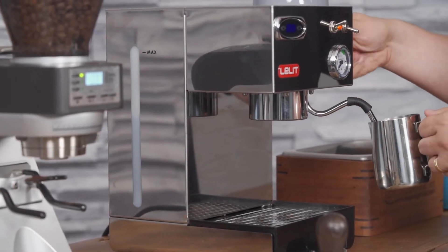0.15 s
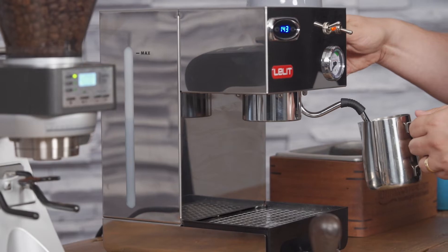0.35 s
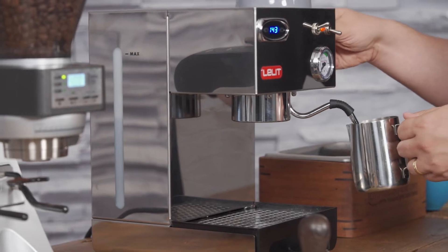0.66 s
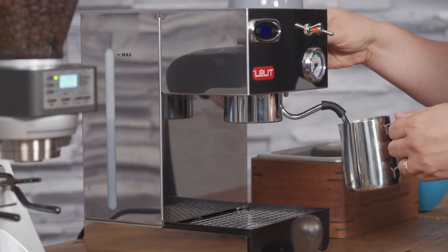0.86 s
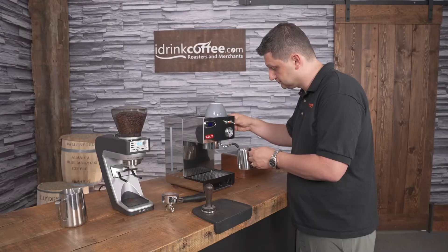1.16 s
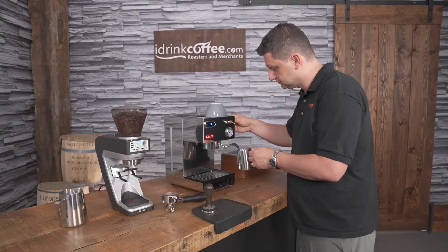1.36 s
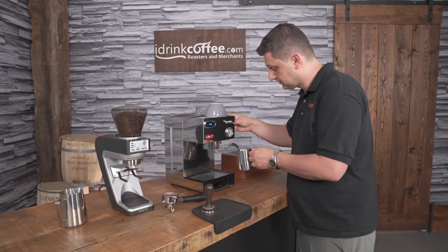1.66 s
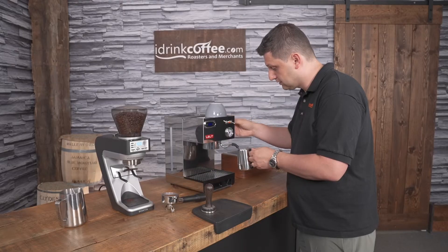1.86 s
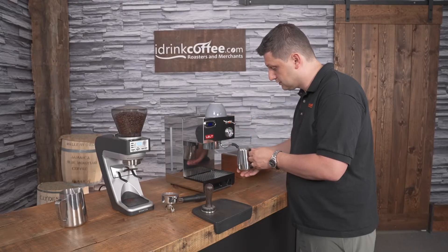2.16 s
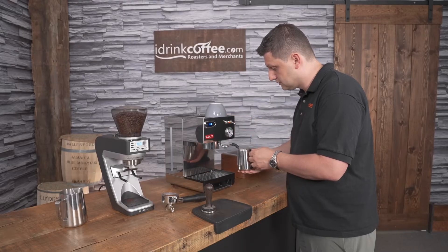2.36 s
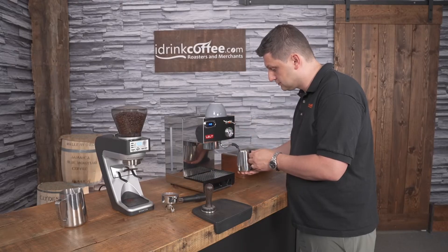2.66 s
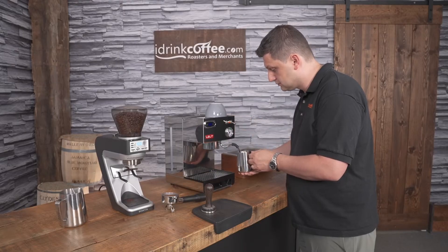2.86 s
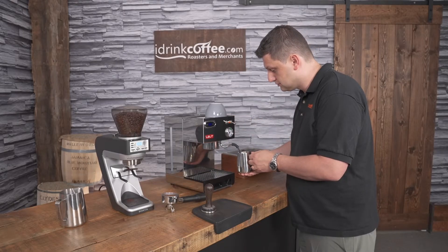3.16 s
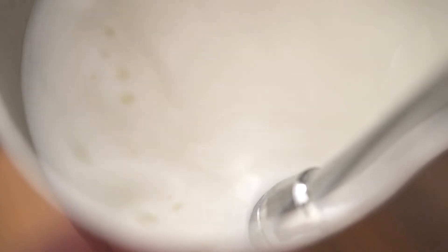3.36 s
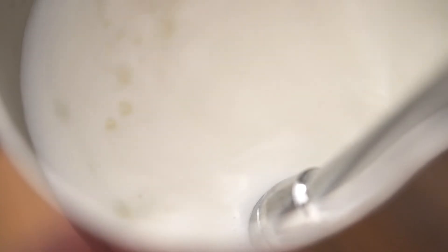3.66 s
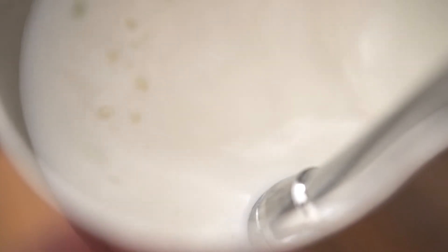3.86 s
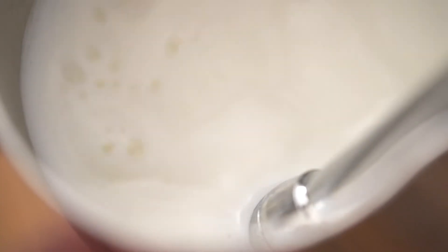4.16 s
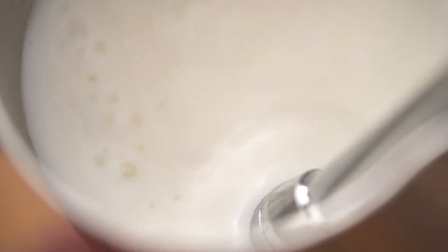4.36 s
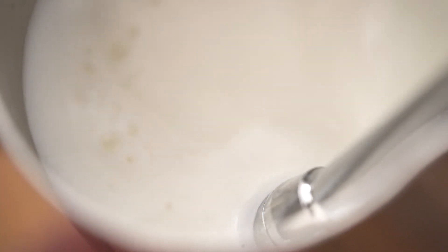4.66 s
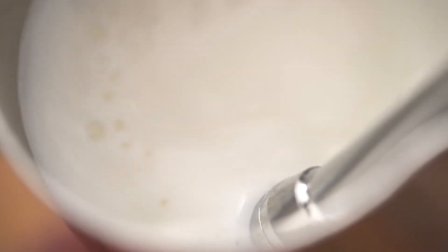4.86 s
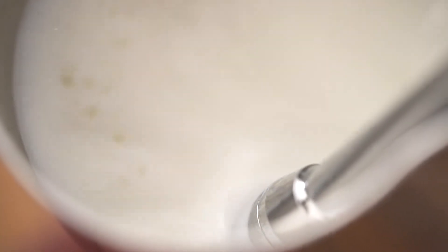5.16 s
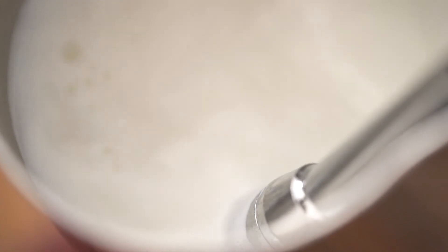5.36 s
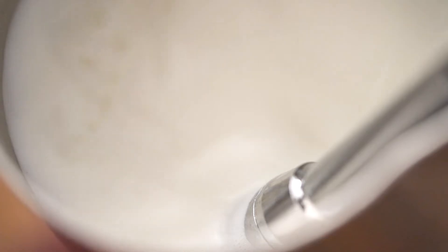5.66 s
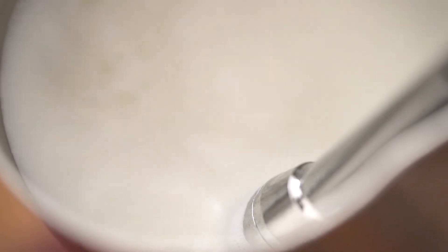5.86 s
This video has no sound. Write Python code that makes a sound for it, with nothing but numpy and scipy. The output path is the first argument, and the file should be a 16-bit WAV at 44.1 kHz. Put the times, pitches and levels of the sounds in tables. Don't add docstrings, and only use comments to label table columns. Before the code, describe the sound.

A close, single-channel sound of milk being steamed in a steel pitcher in a quiet room. From 0 to 1 s there is only faint room air, tiny spits, small bubble plops around 0.35 and 0.55-0.8, and barely audible metal touches with a thin hum. Sputters grow from 1.05, and at about 1.3 s wet gushes break into a roar. From 1.45 to 2.7 s it is loudest: hissing steam, hollow gurgling gulps booming in the pitcher, some overloaded, and from 1.7 a rough, broken squeal near 2 kHz. From 2.7 to 3.5 the gulps cease and the squeal tightens higher, wavering, over hiss. A sharp spitting crackle comes around 3.45. Then the tip sinks: a softer, steadier hiss with a weak high whine and seething. At about 4.95 s it cuts off; a faint seep, low hum, small spits and plops near 5.1, 5.3, 5.8 and 5.9 remain.

```python
import sys
import numpy as np
from scipy import signal
from scipy.fft import rfft, irfft, next_fast_len
from scipy.io import wavfile
from scipy.ndimage import uniform_filter1d, map_coordinates

SR = 44100
rng = np.random.default_rng(int(sys.argv[2]) if len(sys.argv) > 2 else 0)


def bounce(signal):
    frames = np.transpose(np.atleast_2d(signal))
    limited = np.clip(frames, -1, 1)
    pcm = np.round(limited * 32767).astype(np.int16)
    wavfile.write(sys.argv[1], SR, pcm)


def ratio_of_db(decibels):
    return 10 ** (np.asarray(decibels, float) / 20)


N = 264864
TIME_S = np.arange(N) / SR
CUT_S = 4.96
ROAR_S, SONG_S = 1.3066, 1.7

# start in seconds, length in seconds, first pitch in Hz, last pitch in Hz, level in dB.
SQUEAL_LIVES = [(1.7, 0.056, 1587, 1623, -23.5), (1.74, 0.024, 1932, 2120, -17),
                (1.766, 0.022, 2124, 1946, -19.5), (1.788, 0.017, 1930, 1945, -16.5),
                (1.81, 0.064, 1907.0, 2048.0, -30), (1.874, 0.012, 1627, 1626, -38),
                (1.89, 0.011, 1567, 1588, -19.5), (1.904, 0.071, 1915.0, 2003.0, -21),
                (1.97, 0.024, 2166, 2129, -24), (1.995, 0.031, 2088, 2263, -17.5),
                (2.027, 0.065, 2000.0, 2000, -27.5), (2.091, 0.031, 2014, 2067, -28),
                (2.117, 0.02, 2072.0, 2108, -17.5), (2.137, 0.015, 2187, 2127, -15),
                (2.155, 0.078, 2005, 1980, -18.5), (2.207, 0.032, 2050.0, 2031, -19.5),
                (2.243, 0.058, 2067, 1804, -25.5), (2.323, 0.03, 1789, 1859, -22.5),
                (2.349, 0.016, 2018, 2003.0, -11.5), (2.371, 0.014, 2009, 2000, -23.5),
                (2.385, 0.0205, 1937, 2103, -18.5), (2.405, 0.029, 2291.0, 2287.0, -20),
                (2.428, 0.056, 2160.0, 2222, -15), (2.476, 0.04, 2309, 2364, -20),
                (2.512, 0.03, 1966, 1964, -18), (2.546, 0.042, 1983, 1885, -26.5),
                (2.588, 0.044, 1898, 1832.0, -16.5), (2.63, 0.019, 1854, 2152, -17.5),
                (2.648, 0.013, 2076, 2002, -23), (2.66, 0.029, 1832, 2122, -18),
                (2.69, 0.014, 2117, 2403, -29)]
# [s, s, Hz, Hz, dB].
TIGHT_LIVES = [(2.701, 0.031, 2410, 2304, -19), (2.731, 0.028, 2363, 2630, -18),
               (2.757, 0.03, 2522.0, 2446, -16.5), (2.788, 0.026, 2683, 2740, -21),
               (2.813, 0.087, 2707, 2894.0, -27), (2.89, 0.056, 2750, 2605.0, -22.5),
               (2.946, 0.015, 2610, 2400, -25), (2.957, 0.051, 2409, 2333.0, -18.5),
               (3.008, 0.041, 2155, 2170, -23), (3.053, 0.019, 2386, 2620, -22.5),
               (3.075, 0.042, 2290, 2537, -26), (3.115, 0.014, 2517, 2780, -14),
               (3.134, 0.017, 2867, 2915.0, -24.5), (3.145, 0.072, 2677, 2735, -21.5),
               (3.214, 0.053, 2746, 3020, -27.5), (3.266, 0.02, 2780, 2861.0, -21.5),
               (3.305, 0.077, 2733, 2536, -27), (3.373, 0.036, 2584, 2327.0, -20.5),
               (3.409, 0.016, 2348.0, 2514, -27), (3.425, 0.017, 2605, 2786.0, -22.5),
               (3.509, 0.034, 2284.0, 2290, -24), (3.536, 0.018, 2432, 2398.0, -27.5),
               (3.554, 0.026, 2127, 2118, -27.5), (3.579, 0.02, 2047, 2450, -39.5)]
# [s, s, Hz, Hz, dB].
SUNK_LIVES = [(3.602, 0.038, 2467.0, 2464.0, -27), (3.638, 0.019, 2445.0, 2480.0, -21.5),
              (3.658, 0.043, 2645.0, 2891.0, -26), (3.698, 0.017, 2891.0, 2754.0, -20.5),
              (3.722, 0.042, 2760.0, 2683.0, -34.5), (3.761, 0.012, 2697.0, 2652, -21),
              (3.776, .019, 2600, 2510, -26.5), (3.795, 0.073, 2670.0, 2786.0, -34.5),
              (3.867, 0.015, 2791.0, 2640.0, -29), (3.881, 0.028, 2436.0, 2434.0, -24.5),
              (3.911, 0.025, 2475.0, 2551.0, -29.5), (3.935, 0.052, 2955.0, 2932.0, -29.5),
              (3.985, 0.05, 2771.0, 2962.0, -33.5), (4.141, 0.044, 2686.0, 2747.0, -42.5),
              (4.182, 0.025, 2755.0, 2759.0, -30), (4.204, 0.07, 2825.0, 2890.0, -35),
              (4.272, 0.0386, 2507.0, 2418.0, -34.5), (4.312, 0.051, 2579.0, 2849.0, -37),
              (4.4, 0.058, 2811.0, 2797.0, -39), (4.5, 0.047, 2913.0, 2794.0, -41),
              (4.536, 0.11, 2900.0, 2721.0, -34.5), (4.653, 0.046, 2898.0, 2734.0, -29.5),
              (4.699, 0.064, 2860.0, 2826.0, -31.5), (4.769, 0.089, 2783.0, 2700.0, -29),
              (4.857, 0.024, 2689.0, 2869.0, -34.5)]
# frequency in Hz, level in dB, 60 dB decay time in seconds.
STEEL_MODES = [(3770, -5, 0.18), (4540, -3, 0.17), (5340, 5, 0.15), (5870, 0.5, 0.21)]


def unit(x):
    return x / np.sqrt(np.mean(np.abs(x) ** 2) + 1e-20)


def along(points, hz):
    f, v = np.transpose(points)
    return np.interp(np.log(hz + 1), np.log(f + 1), v)


def curves(table):
    s, *columns = np.transpose(table)
    return [np.interp(TIME_S, s, column) for column in columns]


def wobble(knots_per_s):
    return map_coordinates(rng.standard_normal(N // 20), [np.arange(N) * knots_per_s / SR])


def filtered(x, response):
    m = next_fast_len(N + 8192)
    return irfft(rfft(x, m) * response(np.fft.rfftfreq(m, 1 / SR)), m)[:N]


def noise(response, patchy_db):
    z = signal.stft(rng.standard_normal(N + 512), nperseg=256)[2]
    field = uniform_filter1d(rng.standard_normal(z.shape), size=5, axis=0)
    field = uniform_filter1d(field, size=6, axis=1)
    depth_db = np.interp(np.linspace(0, N, z.shape[1]), np.arange(N), patchy_db * np.ones(N))
    patchy = signal.istft(z * ratio_of_db(depth_db * unit(field)), nperseg=256)[1][:N]
    return unit(filtered(patchy, response))


def coloured(points, patchy_db):
    return noise(lambda f: ratio_of_db(along(points, f)), patchy_db)


def resonant(modes):
    def response(f):
        return sum(ratio_of_db(db) * (1j * f * w / (c * c - f * f + 1j * f * w)) ** 2 for c, w, db in modes)
    return response


def shifted(x, hz):
    analytic = signal.hilbert(x, next_fast_len(N))[:N]
    return (analytic * np.exp(2j * np.pi * np.cumsum(hz) / SR)).real


def bursts(rows, rise_s, fall_s):
    gain, t = np.zeros(N + SR), np.arange(SR // 8) / SR
    for s, db, length_s in rows:
        closing = 1 + np.exp(np.clip((t - length_s) / fall_s, -50, 50))
        gain[round(s * SR):][:len(t)] += ratio_of_db(db) * (1 - np.exp(-t / rise_s)) / closing
    return gain[:N]


def whistles(at, hz, db, life_s, glide_oct):
    step = np.arange(1500)
    age = step / SR / life_s
    phase = 2 * np.pi * np.cumsum(hz * 2 ** (glide_oct * np.minimum(age, 2)), axis=1) / SR
    notes = ratio_of_db(db) * age * np.exp(1 - age ** 2) * np.sin(phase)
    return np.bincount((at + step).ravel(), notes.ravel(), N + 1500)[:N]


def valve():
    # time in seconds, flow in dB, air in dB, depth as dB of sizzle lost.
    open_valve = [(0.0, -101, -17, -4), (0.59, -78, 16, -5.5), (0.72, -70.5, 29, 2),
                  (0.87, -71.5, 2, -15.5), (1.05, -64, -28, -4.5), (1.34, -49, 19.5, 7.5),
                  (1.455, -34.5, 2.5, 9), (1.47, -41, 20.5, 22.5), (1.69, -30, 1, 5), (2.11, -29.5, -6, -1),
                  (2.6, -26, -12, 6), (2.77, -29, -16.5, 1.5), (3.3, -33, -18.5, 2),
                  (3.471, -37, -2.5, -5.5), (3.608, -33, -20.5, 10), (3.72, -35.5, -30.5, 12),
                  (4.799, -36.5, -36.5, 7), (4.92, -39.5, -13, -6)]
    # start in seconds, extra air in dB, length in seconds.
    draughts = [
        (2.003, 1, 0.061),
        (2.1, 1.5, 0.13),
        (2.42, 0.5, 0.064),
        (2.796, -11, 0.16),
        (2.94, 9, .17),
        (3.148, 5.5, 0.028),
        (3.193, -23.5, 0.103),
        (3.882, 13, 0.13),
        (4.578, 12, .3),
    ]
    # flow, air and depth in dB.
    seep = (-57, -3.2, 5.7)
    flow_db, air_db, depth_db = curves(open_valve)
    for s, db, length_s in draughts:
        air_db = air_db + db * np.clip(np.minimum(TIME_S - s, s + length_s - TIME_S) / 0.0064, 0, 1)
    return [np.where(TIME_S > CUT_S, rest, flowing)
            for flowing, rest in zip((flow_db, air_db, depth_db), seep)]


def wall(f):
    # frequency in Hz, width in Hz, lift in dB.
    wall_modes = [(2930, 110, -2.5), (4110, 1100, 6.5), (5330, 1260, 6.5), (5740, 180, 3.5),
                  (7250, 1480, 7.5), (9570, 580, 3), (14100, 1400, 7.5)]
    return sum(db / (1 + (2 * (f - c) / w) ** 2) for c, w, db in wall_modes)


def spit_gain(lean, db):
    # start in seconds, peak in dB, tilt in dB.
    spits = [(0.155, -46.5, -1), (0.556, -45.5, -6), (.676, -63, -8), (0.799, -49.5, -15), (0.878, -57, 5),
             (0.922, -48, 13), (0.943, -39.5, 0), (1.031, -44, -6), (1.955, -18, 9), (2.0235, -11, -2),
             (2.6663, -13, 7.5), (3.2902, -23, 13.5), (3.5655, -14, -3), (5.0875, -35.5, 15.5),
             (5.138, -38.5, 1.5), (5.281, -36.5, 16.5), (5.847, -50.5, 22), (5.9114, -33.5, 22)]
    # start in seconds, peak in dB, tilt in dB.
    snaps = [(.231, -46, -13), (.277, -49, -12), (1.2106, -33.5, -11), (1.225, -23, -9), (1.236, -27, -9),
             (3.428, -9, 13), (3.4547, -18, 21.5), (3.461, -17.5, 20), (3.4649, -14, 25), (4.184, -22, -3),
             (3.762, -20, -2)]
    # start in seconds, peak in dB, tilt in dB, length in seconds.
    gushes = [(1.056, -32.5, -14.5, 0.013), (1.066, -35.5, -11, 0.024), (1.087, -27.5, -5.5, 0.034),
              (1.2586, -31, -17.5, 0.04), (1.3066, -19, -5.5, 0.033), (1.466, -9, -8.5, 0.038),
              (1.5, -9.5, -6.5, 0.039), (1.535, -9.5, -7, 0.03), (1.68, -16, -3.5, 0.054),
              (1.764, -29.5, 13.5, 0.045), (1.806, -20, -4, 0.025), (2.341, -21, -7.5, 0.015),
              (2.498, -15.5, -7, 0.046), (2.943, -22, 6, 0.099), (3.313, -21, -1.5, 0.066),
              (3.435, -27, 16, 0.045), (3.511, -20.5, 2.5, 0.031), (3.575, -25, 6, 0.019),
              (3.8746, -26.5, -15.5, 0.023), (3.636, -35, 0, 0.021), (3.742, -39.5, 11, 0.071),
              (3.808, -42.5, 14, .1), (4.739, -43.5, 13, 0.048), (4.923, -39.5, 12, 0.022),
              (5.92, -42, 12, 0.021)]
    rows = [(*row, 0.0087) for row in spits] + [(*row, 0.0019) for row in snaps] + list(gushes)
    leaning = [(s, peak + lean * tilt + db, length_s) for s, peak, tilt, length_s in rows]
    return bursts(leaning, rise_s=.002, fall_s=.0013)


def jet():
    # frequency in Hz, level in dB per Hz.
    hiss_colour = [(1200, -43), (1900, -8), (2900, 4), (3550, -4), (5330, -1), (6370, -11.5), (7500, -9.5),
                   (9750, -36), (16500, -120)]
    # frequency in Hz, level in dB per Hz.
    sizzle_colour = [(3530, -29.5), (6000, -12), (8570, -8.5), (9740, -3), (14700, -23.5), (16000, -21.5)]
    # frequency in Hz, level in dB per Hz.
    splash_colour = [(900, -18), (1300, 6.5), (2000, 8.5), (3000, 8), (3800, 2.5), (6000, -50)]
    # frequency in Hz, width in Hz, level in dB.
    leak_modes = [(4500, 300, -1), (5830, 300, 2), (3340, 1400, -5), (7440, 440, -2), (9500, 254, -6)]
    flow_db, air_db, depth_db = valve()
    unrest = np.clip(1.5 + air_db / 48, .3, 1)
    flutter_db, jitter_db = 1.9 * unrest * wobble(30), 2.2 * unrest * wobble(90)

    hiss_gain = ratio_of_db(flow_db + flutter_db + jitter_db) + spit_gain(lean=0, db=-9.5)
    hiss = hiss_gain * noise(lambda f: ratio_of_db(along(hiss_colour, f) + wall(f)), 4.35 * unrest)
    sizzle_gain = ratio_of_db(flow_db - depth_db + 2 * flutter_db + jitter_db) + spit_gain(lean=1, db=-12.0)
    sizzle = sizzle_gain * noise(lambda f: ratio_of_db(along(sizzle_colour, f) + wall(f)), 4.3 * unrest)
    splash = spit_gain(lean=-1.07, db=-19.0) * coloured(splash_colour, patchy_db=4.0)
    slurp_db = flow_db - 2 + 0.75 * np.minimum(air_db, 0) + 2 * flutter_db
    slurp = ratio_of_db(slurp_db) * noise(resonant([(2074, 490, 0)]), patchy_db=2.5)
    leak = ratio_of_db(-59 + flutter_db) * (TIME_S > CUT_S) * noise(resonant(leak_modes), patchy_db=0.0)
    return hiss + sizzle + splash + slurp + leak


def pitcher_air():
    # frequency in Hz, width in Hz, level in dB.
    low_stages = [
        [(950, 55, 7), (706, 360, -4), (1150, 140, -13)],
        [(850, 38, 4), (950, 18, -15.5)],
        [(769, 53, -1), (940, 31, -22.5)],
        [(750, 150, -7.5), (960, 78.6, -4.5)],
    ]
    # frequency in Hz, width in Hz, level in dB.
    high_modes = [(1290, 159, 6), (1189.6, 70, -2)]
    # time in seconds, upper resonance in Hz.
    headroom = [(2.6, 1299), (2.9, 1270), (3.15, 1309), (3.35, 1202), (3.55, 1230), (3.7, 1419),
                (3.83, 1418), (3.9, 1230), (4.25, 1389), (4.6, 1340), (4.95, 1318)]
    flow_db, air_db, _ = valve()
    foam = np.interp(TIME_S, [1.24, 1.29, 1.75, 2.3, 2.6, 3.9], [0, 1, 1, 2, 1.5, 3.5])
    hollow = 0
    for stage, modes in enumerate(low_stages):
        share = np.sqrt(np.maximum(1 - abs(foam - stage), 0))
        hollow = hollow + share * noise(resonant(modes), patchy_db=-3.5)
    low = ratio_of_db(flow_db + air_db + 1.4 * wobble(40)) * hollow

    room_hz, = curves(headroom)
    high_db = flow_db + 5.5 + 0.47 * np.minimum(air_db, 0)
    high_db = high_db - 9 * (foam < .5)
    ring = shifted(noise(resonant(high_modes), patchy_db=2.0), room_hz - high_modes[0][0])
    return low + ratio_of_db(high_db + 2.2 * wobble(40)) * ring


def fizz():
    # start in seconds, level in dB, length in seconds.
    breaks = [
        (3.44, -30, 0.043),
        (4.742, -34, 0.017),
        (4.876, -33.5, 0.076),
        (5.089, -38, 0.01),
        (5.284, -46, 0.0038),
        (5.847, -35, 0.0057),
        (5.912, -29, 0.014),
    ]
    gain = bursts(breaks, rise_s=0.0016, fall_s=0.00134)
    return gain * noise(resonant([(14300, 1400, 0)]), patchy_db=-6.5)


def glides(rows):
    s, length_s, first_hz, last_hz, db = np.transpose(rows)
    now = np.maximum(np.searchsorted(s, TIME_S) - 1, 0)
    age = np.clip((TIME_S - s[now]) / length_s[now], 0, 1)
    hz = first_hz[now] + (last_hz - first_hz)[now] * age
    alive = np.abs(np.sin(np.pi * age)) ** 0.099 * (age > 0) * (age < 1)
    return [uniform_filter1d(v, size=130) for v in (hz, db[now], alive)]


def pocket():
    # multiple of the pitch, level in dB, smear in Hz.
    overtones = [(1, 2, 120), (2, -14.5, 380), (3, -18.5, 920)]
    # start in seconds, level in dB, length in seconds.
    flares = [
        (2.69, -25, 0.031),
        (2.89, -21.5, 0.015),
        (2.945, -34, 0.066),
        (3.04, -23, 0.077),
        (3.2, -46, 0.089),
        (3.31, -20.5, 0.05),
        (3.375, -21, 0.059),
        (3.51, -41, .03),
    ]
    hz, db, alive = glides(np.vstack([SQUEAL_LIVES, TIGHT_LIVES, SUNK_LIVES]))
    phase = 2 * np.pi * np.cumsum(hz * (1 + .014 * wobble(120))) / SR
    tone = 0
    for multiple, level_db, smear_hz in overtones:
        clear = 2.2 / multiple * np.clip((db + 44.5) / 22, 0, 1)
        core = unit(clear + wobble(smear_hz) + 1j * wobble(smear_hz))
        strands = wobble(6.0 * smear_hz / multiple) + 1j * wobble(6.6 * smear_hz / multiple)
        gain = ratio_of_db(db + level_db) * alive
        if multiple == 2:
            gain = gain + ratio_of_db(1.5) * bursts(flares, rise_s=0.0044, fall_s=0.003)
        tone = tone + gain * ((core + 0.37 * strands) * np.exp(1j * multiple * phase)).real
    return ratio_of_db(1.1 * wobble(45)) * tone


def splits():
    hz, db, alive = glides(np.vstack([SQUEAL_LIVES, TIGHT_LIVES, SUNK_LIVES]))
    when, pitch, glide, size, life, octave = rng.random((900, 6)).T[..., None]
    at = ((SONG_S + when * (CUT_S - SONG_S)) * SR).astype(int)
    upper = octave > .6
    level_db = db[at] - 5.5 - 6.0 * upper - 7.3 * size - 60 * (alive[at] < .5)
    note_hz = hz[at] * 2 ** (upper + 0.1314 * (2 * pitch - 1))
    return whistles(at, note_hz, level_db, life_s=0.0079 * (.5 + life), glide_oct=.15 * (glide - .3))


def gulps():
    # start in seconds, peak in dB, pitch in Hz, length in seconds.
    bubbles = [(.352, -34, 850, 0.024), (.372, -43, 1035, 0.016), (.575, -31, 1150, 0.0058),
               (0.601, -27.5, 960, 0.0061), (.64, -25, 706, 0.0099), (0.658, -26, 827, 0.0064),
               (0.679, -19, 990, 0.0051), (.688, -33, 1150, 0.0073), (0.737, -18.5, 886, 0.019),
               (.757, -35, 1150, 0.016), (.78, -24.5, 700, 0.0091), (1.704, -1, 1364, 0.0095),
               (1.722, -7, 1510, 0.013), (0.795, -28, 850, 0.018)]
    # start in seconds, peak in dB, pitch in Hz, length in seconds.
    rising = [(0.4713, -44, 1290, 0.0064), (1.118, -34, 887, 0.021), (1.306, -9.5, 1243, 0.022),
              (1.42, -10.5, 796, 0.013), (1.4713, -4, 1220, 0.015), (1.484, -4.5, 824, 0.021),
              (1.49, -4, 1274, 0.048), (1.521, -3.5, 1349, 0.014), (1.62, -6.5, 850, 0.021),
              (1.673, -2.5, 860, 0.011), (1.697, 4.5, 1161, 0.0098), (1.718, -13.5, 3283, 0.02),
              (1.908, -18.5, 3770, 0.02), (2.428, -17.5, 6800, 0.05), (1.8918, 3, 1383, 0.0054),
              (1.988, -10, 1320, 0.013), (2.032, -7, 808, 0.032), (2.0645, 7.5, 1314, 0.012),
              (2.0824, 0.5, 1338, 0.016), (2.298, -4.5, 787, 0.031), (2.548, -5, 1350, 0.018),
              (2.562, -3, 790, .024), (2.564, -2, 1335, 0.022), (2.659, -8.5, 1318, 0.012)]
    # start in seconds, peak in dB, pitch in Hz, length in seconds.
    sinking = [(0.319, -36, 950, 0.026), (0.559, -33.5, 840, 0.056), (1.062, -21, 875, 0.031),
               (1.274, -4.5, 802, 0.018), (1.294, 2, 708, 0.023), (1.333, -10, 744, 0.03),
               (1.5509, 1.5, 1280, 0.0055), (1.555, 0, 855, 0.03), (1.647, -5.5, 843, 0.021),
               (1.697, 5.5, 833, 0.014), (1.8088, -4, 1410, 0.01), (1.816, 1, 746, 0.031),
               (1.862, -4.5, 752, 0.03), (1.9, -7.5, 697, 0.033), (2.0268, 5, 1290, 0.0079),
               (2.06, -0.5, 818, 0.017), (2.1014, -1.5, 1310, 0.016), (2.2412, 3, 1246, 0.0066),
               (2.247, 5, 1294, 0.0071), (2.251, -4, 776, 0.046), (2.2987, 0.5, 1264, 0.024),
               (2.518, -2.5, 1350, 0.012), (2.523, 2, 1113, 0.012), (2.531, 5, 764, 0.02),
               (2.6004, -8, 1323, 0.019), (3.479, -20.5, 3590, 0.011), (3.615, -24.5, 3410, 0.022),
               (3.7636, -28, 1404, 0.015), (4.9276, -27.5, 1370, .011), (5.089, -24.5, 1290, 0.008),
               (5.345, -30.5, 740, 0.0099), (5.764, -35, 2040, 0.0053), (5.7705, -19, 1290, 0.0039),
               (5.772, -31, 720, 0.0063), (5.917, -29, 1157, 0.008)]
    # frequency in Hz, level in dB per Hz.
    gurgle_colour = [(480, -70), (620, 5.5), (900, 12.5), (1400, -12), (2200, -27), (4000, -50)]
    out, t = np.zeros(N + SR), np.arange(SR // 8) / SR
    sources = [wobble(300), wobble(150), coloured(gurgle_colour, patchy_db=0.5)]
    ragged, uneven, gurgle = np.pad(sources, ((0, 0), (0, SR)))
    for rows, glide_oct in [(bubbles, 0.27), (rising, 0.11), (sinking, -0.079)]:
        for s, db, hz, length_s in rows:
            at = slice(round(s * SR), round(s * SR) + len(t))
            glide_hz = hz * 2 ** (glide_oct * (np.minimum(t / length_s, 1.8) - .6))
            unrest = 0.43 * max(hz / 1500, 1)
            phase = 2 * np.pi * np.cumsum(glide_hz) / SR + unrest * ragged[at]
            hold = max(2.16 + 0.0528 * db, 1.5)
            swell = ratio_of_db(-9 * (t / length_s) ** hold) * (1 - np.exp(-t / 0.00089))
            rough = ratio_of_db(-19.0 - .28 * db)
            out[at] += ratio_of_db(db - 1.5 + uneven[at]) * swell * (np.sin(phase) + rough * gurgle[at])
    return filtered(out[:N], lambda f: f ** 6 / (f ** 6 + 800.0 ** 6))


def chirps():
    # start in seconds, level in dB, length in seconds.
    seethes = [
        (3.77, -31.5, 0.037),
        (4.19, -34, .06),
        (4.3, -31.5, 0.093),
        (4.4, -35.5, .09),
        (4.65, -33, 0.056),
        (4.77, -36.5, 0.13),
        (4.9, -34, 0.056),
    ]
    flow_db, air_db, _ = valve()
    seethe = bursts(seethes, rise_s=0.0037, fall_s=0.0072) * noise(resonant([(5260, 860, 0)]), patchy_db=1.0)
    when, pitch, glide, size, life = rng.random((900, 5)).T[..., None]
    at = ((ROAR_S + when * (CUT_S - ROAR_S)) * SR).astype(int)
    db = flow_db[at] - 6.5 + .3 * np.minimum(air_db[at], 0) - 3.2 * np.log(size + 0.03)
    hz = 4013 * 2 ** (.6 * (2 * pitch - 1))
    return whistles(at, hz, db, life_s=.007 * (.5 + life), glide_oct=.28 * (glide - .25)) + seethe


def milk():
    # frequency in Hz, level in dB per Hz.
    churn_colour = [(15, -36), (25, -8.5), (43, -21), (118, -4.5), (253, 0), (515, 0), (626, -17), (700, 6),
                    (910, -37), (1540, -120)]
    # start in seconds, peak in dB.
    thumps = [(0.161, -45), (0.314, -37.5), (1.056, -39), (1.695, -22), (2.065, -34), (2.242, -34),
              (2.298, -46), (2.524, -14), (3.452, -24), (3.461, -17.5), (5.911, -33.5)]
    churn = coloured(churn_colour, patchy_db=1.0)
    heave = bursts([(s, db - 4.5, .006) for s, db in thumps], rise_s=0.0024, fall_s=0.0067) * churn
    heave = filtered(heave, lambda f: f * f / (f * f + 31.0 ** 2))
    flow_db, air_db, _ = valve()
    return ratio_of_db(-47 + 0.25 * flow_db + 0.32 * air_db) * churn + heave


def knocks():
    # start in seconds, level in dB.
    touches = [
        (.559, -59),
        (.806, -59),
    ]
    out, t = np.zeros(N), np.arange(SR // 4) / SR
    for s, db in touches:
        for hz, level_db, t60_s in STEEL_MODES:
            decay = ratio_of_db(db + level_db + rng.normal(0, 3) - 60 * t / t60_s)
            out[round(s * SR):][:len(t)] += decay * np.sin(2 * np.pi * hz * t)
    return out


def singing():
    hum = noise(resonant([(hz, 60, 0) for hz, *_ in STEEL_MODES]), patchy_db=-1.0)
    return ratio_of_db(-75 + 3.0 * wobble(10.3)) * (TIME_S > .558) * (TIME_S < 1.0) * hum


def kitchen():
    # frequency in Hz, level in dB per Hz.
    room_colour = [(15, -52), (25, -10), (102, -1.5), (242, -7), (394, -14.5), (489, -8), (1100, -24.5),
                   (9570, -33), (14000, -28.5), (16000, -61)]
    # start in seconds, end in seconds, pitch in Hz, level in
    # dB.
    tones = [
        (5.15, 5.92, 105, -60),
        (5.2, 5.7, 391, -65),
        (.85, 1.6, 325, -65),
        (1.25, 1.45, 320, -57),
        (.3, .8, 2010, -76),
        (4.922, 4.946, 400, -53),
    ]
    air = ratio_of_db(-61) * coloured(room_colour, patchy_db=-1.0)
    drift = .8 * wobble(14)
    hum = 0
    for start_s, end_s, hz, db in tones:
        edge_s = 0.027 * (end_s - start_s)
        fade = np.clip(np.minimum(TIME_S - start_s, end_s - TIME_S) / edge_s, 0, 1)
        hum = hum + ratio_of_db(db) * fade * np.sin(2 * np.pi * hz * TIME_S + drift)
    return air + ratio_of_db(3 + 1.8 * wobble(14)) * hum


def scene():
    steam = jet() + pitcher_air() + fizz() + pocket() + splits()
    liquid = gulps() + chirps() + milk()
    return (steam + liquid + knocks() + singing() + kitchen())[None]


def top_cut(x):
    return signal.sosfilt(signal.butter(12, 16470, fs=SR, output="sos"), x)


def record(dry):
    flat = dry[0] / (1 + np.abs(dry[0] / .9) ** 6) ** (1 / 6)
    band = filtered(flat, lambda f: (f < 16000) * f / np.hypot(f, 75))
    return top_cut(band[None])


dry = scene()
out = record(dry)
bounce(out)
```